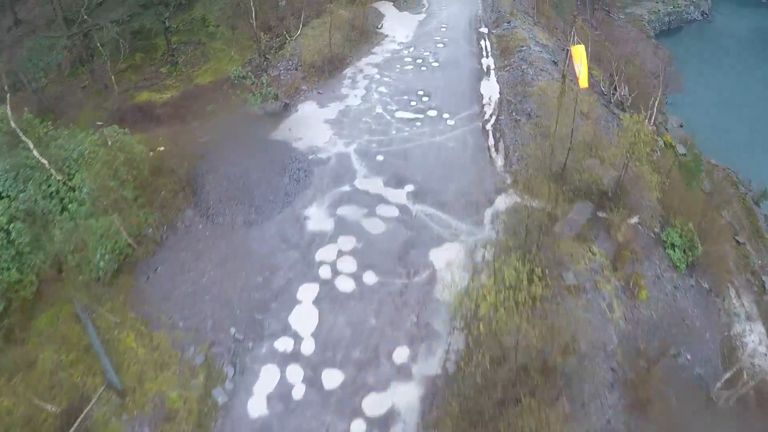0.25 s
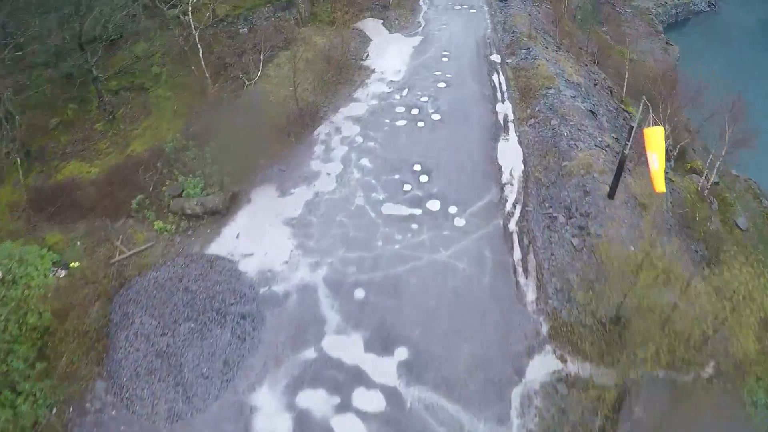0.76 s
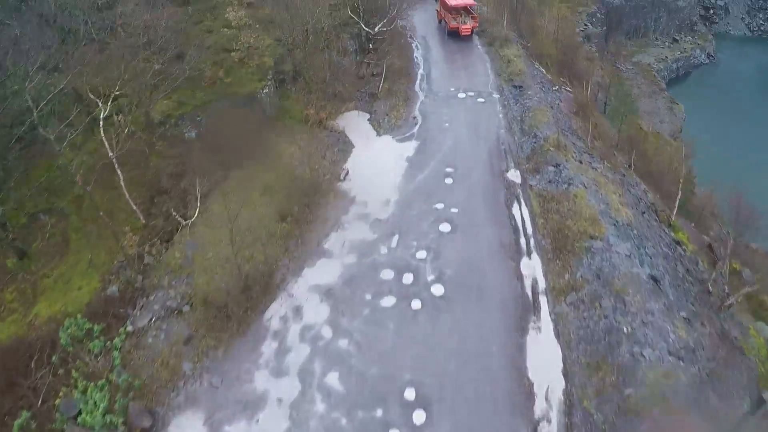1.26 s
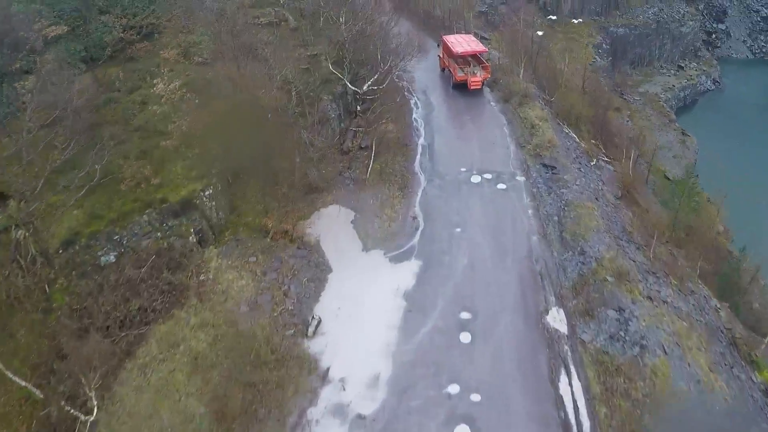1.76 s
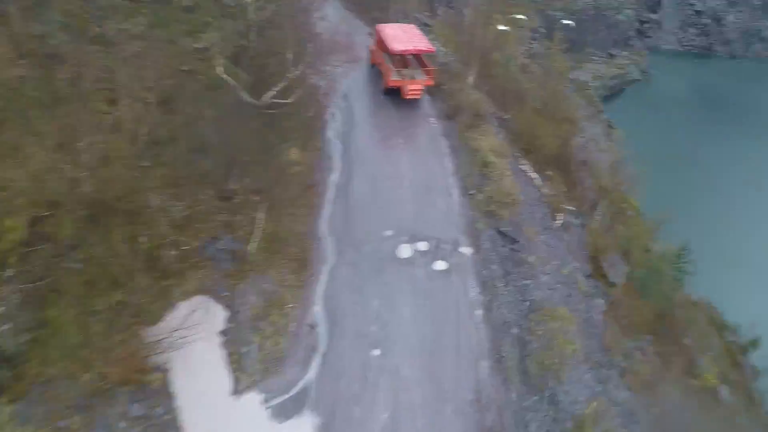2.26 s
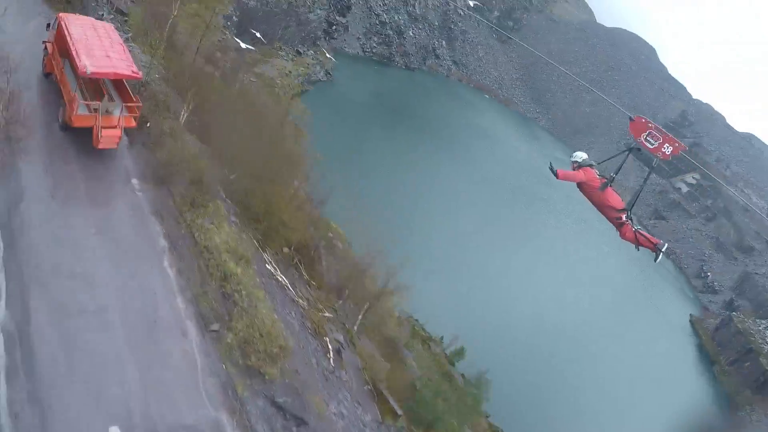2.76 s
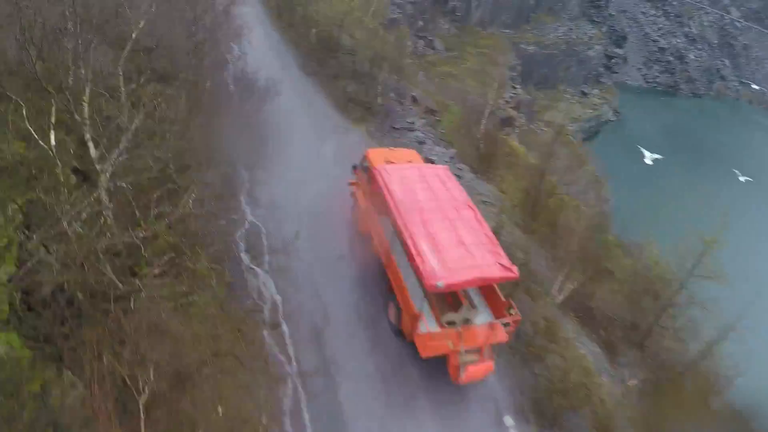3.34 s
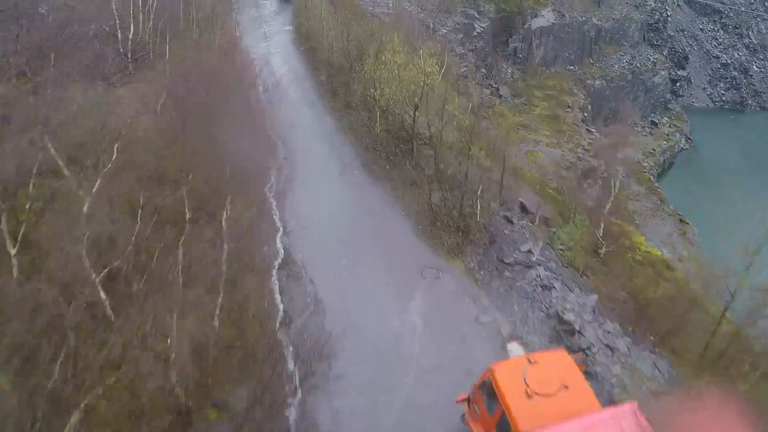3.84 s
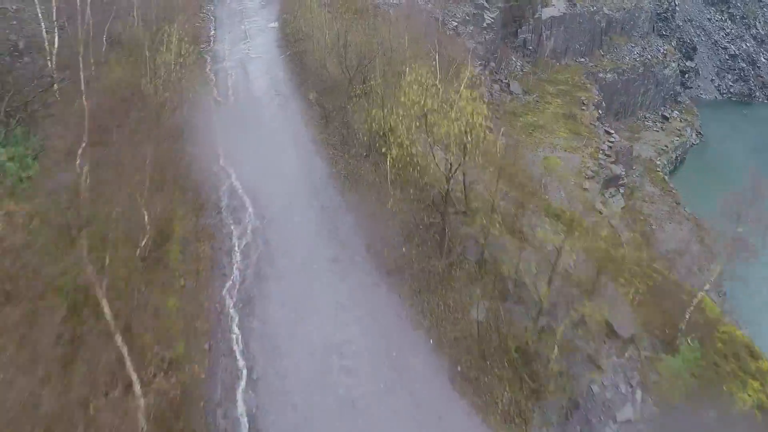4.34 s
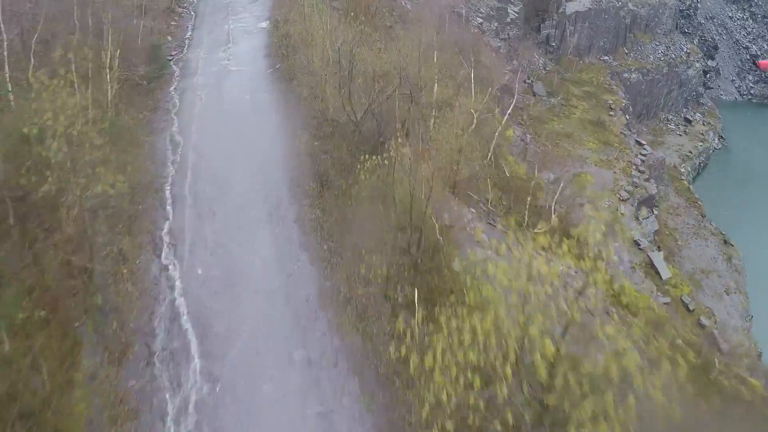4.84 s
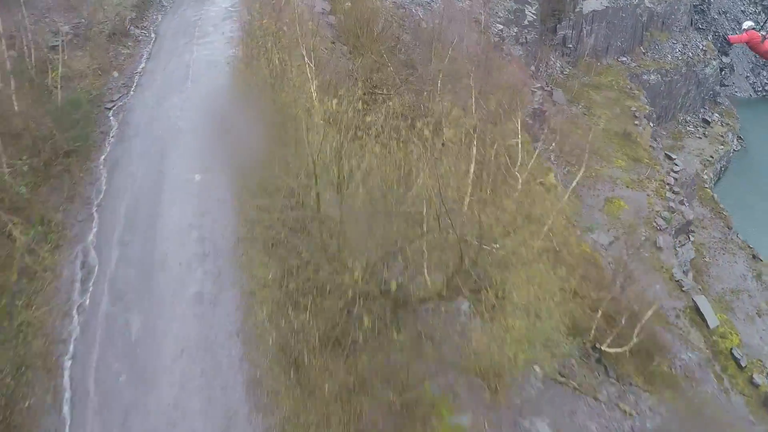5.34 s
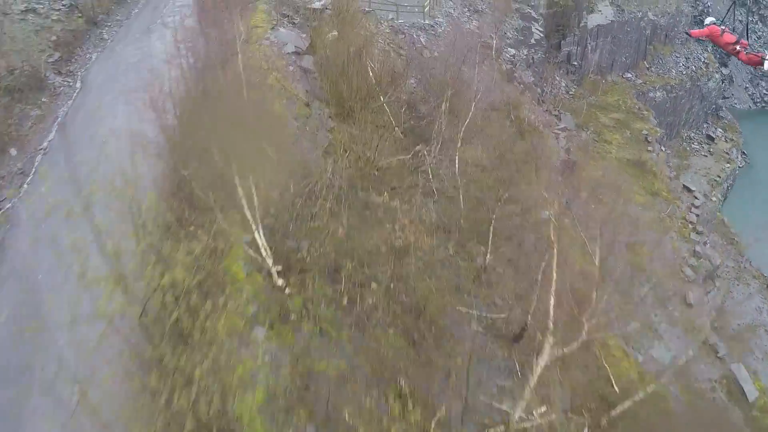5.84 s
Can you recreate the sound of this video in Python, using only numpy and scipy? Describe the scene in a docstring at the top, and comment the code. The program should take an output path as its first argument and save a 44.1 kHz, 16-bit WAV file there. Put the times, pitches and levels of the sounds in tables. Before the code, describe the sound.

A zip line trolley runs along a steel cable with a high, steady whir whose faint tones sink slowly as it loses speed. Air hisses over the cased camera riding with it and thumps the microphone in gusts. A few water drops click sharply on the case. Midway the wind swells into a roar with a hoarse whistle, then more gusts and scattered drop hits follow as the whir weakens.

```python
"""On a zip line, at a cased camera riding with the trolley down a steel cable.
The sheaves whir over the strands and slowly lose speed. The airstream hisses on the case, buffets
the microphone and whistles, loudest while the camera turns sideways. Water drops smack the case;
after the hardest ones the camera's gain control ducks everything and slowly recovers."""
import sys
import numpy as np
from scipy import signal
from scipy.fft import rfft, irfft, next_fast_len
from scipy.io import wavfile
from scipy.ndimage import uniform_filter1d, minimum_filter1d, map_coordinates

SR = 44100
rng = np.random.default_rng(int(sys.argv[2]) if len(sys.argv) > 2 else 0)


def transcribe(signal):
    """Save signal, clipped to [-1, 1], as a 16-bit WAV file at the path in sys.argv[1]."""
    frames = np.atleast_2d(signal).T
    limited = np.clip(frames, -1, 1)
    pcm = np.round(limited * 32767).astype(np.int16)
    wavfile.write(sys.argv[1], SR, pcm)


N = 269010
TIME_S = np.arange(N) / SR


# sheave speed: time_s, turn_hz
SHEAVE_SPEED = [(0, 87), (1, 84.3), (2, 81.4), (3.2, 77.6), (4.5, 73), (5.4, 69.7), (6.1, 67.8)]
# whir envelope: time_s, level_db
WHIR_LEVEL = [(0, -16.5), (.66, -16.5), (1.15, -19), (1.55, -18), (1.75, -22.5), (2.05, -22.5), (2.24, -20),
              (2.37, -29.5), (2.88, -23), (3.0, -26.5), (3.52, -25.5), (3.67, -21), (4.35, -25),
              (4.98, -24), (5.3, -26), (6.1, -27)]
# trolley resonances: centre_hz, width_hz, gain_db
TROLLEY_MODES = [(2553, 460, 2.5), (2814, 510, -2.5), (3165, 470, -5.5), (3860, 350, -11.5),
                 (4000, 180, -14.5), (5590, 620, -17)]
# frame response to sheave tones: pitch_hz, gain_db
FRAME_RESPONSE = [(950, -69), (1090, -51), (1160, -44), (1240, -60), (1375, -59), (1500, -39), (1750, -61),
                  (2000, -52)]

def trolley():
    """Strands rattle under the sheaves and ring the frame; uneven rims add throb and falling tones."""
    whir_db, = curves(WHIR_LEVEL)
    turn_hz, = curves(SHEAVE_SPEED)
    angle = 2 * np.pi * np.cumsum(turn_hz) / SR
    contact = eddies(rate_hz=480, depth_db=2.1)
    throb_db = 0.35 * np.cos(angle) + 0.71 * wobble(23.76)
    drift_db = 0.6 * wobble(7)
    whir = amp(whir_db + lull_db() + drift_db) * resonate(contact * amp(throb_db), TROLLEY_MODES)
    tones = np.zeros(N)
    for harmonic in range(13, 23):  # each swells as it slides through a frame resonance
        tone_db = np.interp(harmonic * turn_hz, *np.transpose(FRAME_RESPONSE)) + 1.9 * wobble(4.22)
        tones += amp(tone_db) * np.sin(harmonic * angle + 2 * np.pi * rng.random())
    follow_db = 0.3 * (whir_db - whir_db.mean())
    return whir + tones * amp(follow_db - 1.5)


# case resonances: centre_hz, width_hz, gain_db
CASE_MODES = [(1635, 450, -6.5), (1835, 280, -1.5), (2160, 370, -2.5), (2430, 345, 0.5), (3893, 820, -13),
              (4730, 220, -28.5), (4676, 110, -16), (5355, 380, -17)]
# fine hiss spectrum: freq_hz, density_db
SPRAY_SPECTRUM = [(900, -40), (3000, 6.5), (4500, 3), (5020, -17), (5500, -2), (6400, 2), (7000, 3),
                  (7600, 1), (8200, -7), (10200, -7), (11400, -11), (12600, -18), (14000, -31),
                  (15500, -40)]
SWAY_HZ, SWAY_PEAK_S, SWAY_DB, SWAY_FADE_S = 1.62, 0.19, 3, 1.3

def airstream():
    """Air stirs the case's resonances and frays into fine hiss that swells as the camera sways."""
    hiss_gain = air_gain(base_db=-23.5, flow_db_per_db=1, speed_db_per_octave=-1, cross_db=-1.5)
    hiss_gain *= amp(0.6 * lull_db() + 1.2 * wobble(9))
    hiss = resonate(eddies(rate_hz=360, depth_db=0.9), CASE_MODES)
    sway = np.cos(2 * np.pi * SWAY_HZ * (TIME_S - SWAY_PEAK_S)) * np.exp(-TIME_S / SWAY_FADE_S)
    spray_gain = air_gain(base_db=-38, flow_db_per_db=0.9, speed_db_per_octave=15.5, cross_db=5)
    spray_gain *= amp(SWAY_DB * sway + 0.84 * wobble(9))
    spray = coloured(eddies(rate_hz=170, depth_db=1.4), SPRAY_SPECTRUM)
    return hiss_gain * hiss + spray_gain * spray


# gusts on the microphone: peak_s, half_width_s, rumble_db, thud_db
MIC_GUSTS = [(0.477, 0.09, -16, -21), (.963, 0.16, -23, -21), (1.535, .04, -16, -33),
             (2.255, 0.024, -17, -37), (3.85, 0.11, -17.5, -35), (4.22, .08, -21, -27),
             (4.718, 0.032, -11, -41), (4.95, 0.029, -16, -39), (5.898, .045, -18, -17.5)]
# wind spectra: freq_hz, density_db
RUMBLE_SPECTRUM = [(5, -38), (14, -9), (25, -2), (42, -1.5), (60, -9), (90, -16.5), (160, -30), (400, -90)]
BUFFET_SPECTRUM = [(30, 0.5), (70, 1), (125, 0), (205, -2), (300, -0.5), (400, -5), (520, -13), (660, -18),
                   (790, -17), (970, -27), (1130, -25.5), (1400, -18), (2200, -24), (6000, -80)]
ROAR_SPECTRUM = [(30, -27), (65, -2.5), (95, -8), (128, 1), (200, -9), (250, -6), (305, -3.5), (400, -13),
                 (500, -19.5), (900, -53), (5000, -72), (6400, -43), (8000, -62), (15000, -100)]
THUD_SPECTRUM = [(30, -16), (80, 8.5), (125, 4), (200, -5.5), (400, -35), (1500, -120)]

def wind():
    """Large eddies thump the microphone, small ones flutter on it; side-on, the air roars."""
    gust_gain = sum(amp(db) * bell(TIME_S, peak_s, width_s) for peak_s, width_s, db, _ in MIC_GUSTS)
    thud_gain = sum(amp(db) * bell(TIME_S, peak_s, width_s) for peak_s, width_s, _, db in MIC_GUSTS)
    rumble_gain = air_gain(base_db=-17.5, flow_db_per_db=0.5, speed_db_per_octave=15.5, cross_db=1)
    buffet_gain = air_gain(base_db=-22, flow_db_per_db=0.75, speed_db_per_octave=3.5, cross_db=3.5)
    rumble = coloured(eddies(rate_hz=9.8, depth_db=2.6), RUMBLE_SPECTRUM)
    rumble *= np.hypot(rumble_gain, gust_gain)
    buffet = buffet_gain * coloured(eddies(rate_hz=21, depth_db=0.87), BUFFET_SPECTRUM)
    roar = amp(-12.5) * crosswind() * coloured(eddies(rate_hz=30, depth_db=0.5), ROAR_SPECTRUM)
    thud = thud_gain * coloured(rng.standard_normal(N), THUD_SPECTRUM)
    return rumble + buffet + roar + thud


# drops on the case: start_s, size_db, hardness_db_per_octave, spot_hz, spot_db
DROP_HITS = [(1.208, -17.5, 1.5, 2330, -9), (1.492, -18, -7, 6200, 2), (1.505, -10, -5, 7300, -17),
             (1.5744, -8.5, -5, 2280, -1), (1.6130, 4.5, -1, 2300, 4.5), (1.618, -3, -7, 2180, 6),
             (4.092, -5, -2, 2350, 0), (4.3982, -0.5, 7.5, 3910, 0), (4.621, -7.5, -5, 7000, -5.5),
             (4.6712, -14.5, -13, 1650, 12.5), (4.9952, 1, -2, 2280, 2.6), (5.3678, -24, -13, 6200, 7),
             (5.5809, -21, 10, 7250, -19), (5.894, -8.5, 9.5, 6800, 0.5), (5.9869, 7.5, 1, 3820, -6.5)]
# shell modes rung by every drop: pitch_hz, gain_db, t60_s
SHELL_MODES = [(2000, -30.5, 0.023), (2030, -21.5, 0.032), (2940, -32, 0.036), (3930, -13, 0.0069),
               (6580, -5, 0.0028), (7420, -17, 0.0055), (9240, -12, 0.003), (11000, -27, 0.0082),
               (13900, -30, 0.0042)]
DROPLETS_PER_S, DROPLET_DB, DROPLET_SPREAD_DB, DROPLET_HZ = 1.5, -31, 2, 6500

def drops():
    """Each drop briefly rings the shell and the spot it strikes; faint droplets land at random."""
    hits = np.zeros(N + SR)
    t = np.arange(SR // 20) / SR
    mode_hz, mode_db, t60_s = np.transpose(SHELL_MODES)[:, :, None]
    droplets = [(when * N / SR, DROPLET_DB + DROPLET_SPREAD_DB * (2 * size - 1), 0, DROPLET_HZ, 0)
                for when, size in rng.random((round(DROPLETS_PER_S * N / SR), 2))]
    for start_s, size_db, hardness_db_per_octave, spot_hz, spot_db in DROP_HITS + droplets:
        scatter_db, detune = rng.standard_normal((2, len(SHELL_MODES), 1))
        strike_db = mode_db + hardness_db_per_octave * np.log2(mode_hz / 3500) + scatter_db
        ring_hz = mode_hz * (1 + 0.03 * detune)
        shell = amp(strike_db - 60 * t / t60_s) * np.sin(2 * np.pi * ring_hz * t)
        spot_t60_s = 0.006 * (3500 / spot_hz) ** 0.14
        spot = amp(spot_db - 60 * t / spot_t60_s) * np.sin(2 * np.pi * spot_hz * t)
        hits[round(start_s * SR):][:len(t)] += amp(size_db) * (shell.sum(axis=0) + spot)
    # a small shell radiates no bass
    return signal.sosfilt(signal.butter(N=4, Wn=1300, btype="high", fs=SR, output="sos"), hits[:N])


# air across a case edge: time_s, pitch_hz, level_db
EDGE_TONE = [(0, 1756, -31), (2.12, 1756, -38.5), (2.53, 1740, -25), (2.75, 1725, -27.5), (3.18, 1696, -26),
             (3.3, 1712, -35.5), (6.1, 1680, -69)]

def whistle():
    """Hoarse edge tone: a wavering core in a skirt of noise centred just below it."""
    def noise_band(rate_hz, phase):
        return wobble(rate_hz) * np.cos(phase) + wobble(rate_hz) * np.sin(phase)

    pitch_hz, level_db = curves(EDGE_TONE)
    angle = 2 * np.pi * np.cumsum(pitch_hz) / SR
    core = 1.1 * np.sin(angle + 0.5 * wobble(30)) + noise_band(45, angle)
    skirt = amp(2) * noise_band(230, 0.965 * angle)
    return amp(level_db) * unit(core + skirt)


# airflow on the case front, weakest when turned aside: time_s, flow_db
FRONT_AIRFLOW = [(0, 0.5), (.24, 0.5), (.45, -1.5), (.9, 0.5), (1.08, -5), (1.33, 1), (1.62, -1),
                 (1.82, -1), (2.15, -12), (2.36, -6), (2.6, -1), (3.2, -6), (3.5, -0.5), (3.85, 2),
                 (4.28, 4), (4.75, 2), (4.97, 3), (5.45, 0.9), (5.8, -1.5), (6.1, 0)]

def air_gain(base_db, flow_db_per_db, speed_db_per_octave, cross_db):
    """Gain of an air layer from airflow, trolley speed and crosswind."""
    flow_db, = curves(FRONT_AIRFLOW)
    turn_hz, = curves(SHEAVE_SPEED)
    speed_db = speed_db_per_octave * np.log2(turn_hz / turn_hz[0])
    return amp(base_db + flow_db_per_db * flow_db + speed_db + cross_db * crosswind())


# air across the microphone, camera sideways: start_s, length_s, strength
CROSS_SWELLS = [(2.324, .285, 0.95), (2.727, 0.36, 0.95)]

def crosswind(attack_s=0.12, release_s=0.12):
    """Strength of the sideways air: each swell rises, holds and dies away."""
    swells = np.zeros(N)
    for start_s, length_s, strength in CROSS_SWELLS:
        rise = np.clip((TIME_S - start_s) / attack_s, 0, 1)
        fall = np.exp(-np.maximum(TIME_S - start_s - length_s, 0) / release_s)
        swells += strength * rise * fall
    return swells


# level dips: centre_s, half_width_s, gain_db
LEVEL_DIPS = [(0.096, 0.075, -1), (0.79, 0.036, -8.5)]

def lull_db():
    """Brief dips in the whir and the hiss."""
    return sum(db * bell(TIME_S, centre_s, width_s) for centre_s, width_s, db in LEVEL_DIPS)


def amp(db):
    """Decibels to gain."""
    return 10 ** (np.asarray(db) / 20)


def unit(x):
    """Scale to rms 1."""
    return x / np.sqrt(np.mean(x ** 2) + 1e-20)


def bell(x, centre, half_width):
    """Gaussian with peak 1."""
    return np.exp(-((x - centre) / half_width) ** 2)


def curves(rows):
    """Per-sample curve for each column after time_s."""
    time_s, *columns = np.transpose(rows)
    return [np.interp(TIME_S, time_s, column) for column in columns]


def wobble(rate_hz):
    """Smooth random curve with knots at rate_hz."""
    knots = rng.standard_normal(int(N * rate_hz / SR) + 4)
    return map_coordinates(knots, [TIME_S * rate_hz])


def eddies(rate_hz, depth_db):
    """Turbulence: noise with a fluttering level."""
    return rng.standard_normal(N) * amp(depth_db * wobble(rate_hz))


def filtered(x, response):
    """Apply the gain response(hz)."""
    size = next_fast_len(N + 8192)
    return irfft(rfft(x, size) * response(np.fft.rfftfreq(size, 1 / SR)), size)[:N]


def coloured(x, spectrum):
    """Shape x to a spectrum; rms 1."""
    freq_hz, db = np.transpose(spectrum)
    return unit(filtered(x, lambda hz: amp(np.interp(np.log(hz + 1), np.log(freq_hz), db))))


def resonate(x, modes):
    """Steep-sided resonances whose powers add; rms 1."""
    def response(hz):
        gains = [amp(db) * (hz * width_hz) ** 2 / ((centre_hz ** 2 - hz ** 2) ** 2 + (hz * width_hz) ** 2)
                 for centre_hz, width_hz, db in modes]
        return np.linalg.norm(gains, axis=0)

    return unit(filtered(x, response))


def scene():
    """All sources at one microphone."""
    return (trolley() + airstream() + whistle() + wind() + drops())[None]


SENSE_LOW_HZ, SENSE_HIGH_HZ, THRESHOLD_DB, DUCK_DB_PER_DB, MAX_DUCK_DB = 1300, 4120, -7, 0.96, 9.5
DUCK_LAG_S, DUCK_ATTACK_S, DUCK_HOLD_S, RECOVER_DB_PER_S = 0.019, 0.042, 0.2, 21

def gain_control(x):
    """An overload turns the gain down a moment later; it holds, then creeps back."""
    sensed = filtered(x, lambda hz: (hz > SENSE_LOW_HZ) & (hz < SENSE_HIGH_HZ))
    level_db = 10 * np.log10(np.abs(uniform_filter1d(sensed ** 2, size=SR // 1000)) + 1e-12)
    wanted_db = -np.clip(DUCK_DB_PER_DB * (level_db - THRESHOLD_DB), 0, MAX_DUCK_DB)
    held_db = minimum_filter1d(wanted_db, round(DUCK_HOLD_S * SR))
    late_db = np.interp(TIME_S - DUCK_HOLD_S / 2 - DUCK_LAG_S, TIME_S, held_db, left=0)
    recovery_db = RECOVER_DB_PER_S * TIME_S
    gain_db = np.minimum.accumulate(late_db - recovery_db) + recovery_db
    return x * amp(uniform_filter1d(gain_db, round(DUCK_ATTACK_S * SR)))


# hollows in the cased microphone's response: centre_hz, half_width_hz, gain_db
CASE_NOTCHES = [(950, 50, -2), (3620, 99, -0.5), (4310, 69, -3), (5020, 120, -2), (6490, 180, -5)]
BAND_LIMIT_HZ = 15400

def record(dry):
    """The case hollows the sound; the camera clips big drops, ducks after them and cuts the top."""
    def case_response(hz):
        return amp(sum(db * bell(hz, centre_hz, width_hz) for centre_hz, width_hz, db in CASE_NOTCHES))

    cased = filtered(dry[0], case_response)
    clipped = np.clip(gain_control(cased), -1, 1)
    return filtered(clipped, lambda hz: 1 / np.sqrt(1 + (hz / BAND_LIMIT_HZ) ** 100))[None]


dry = scene()
out = record(dry)
transcribe(out)
```